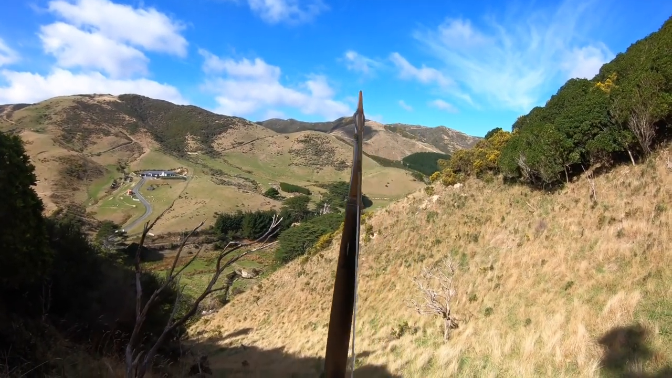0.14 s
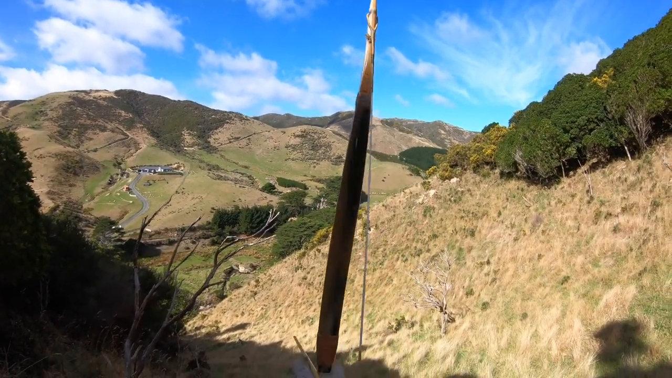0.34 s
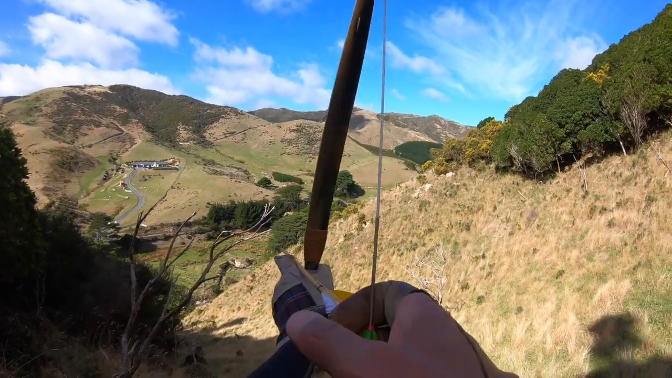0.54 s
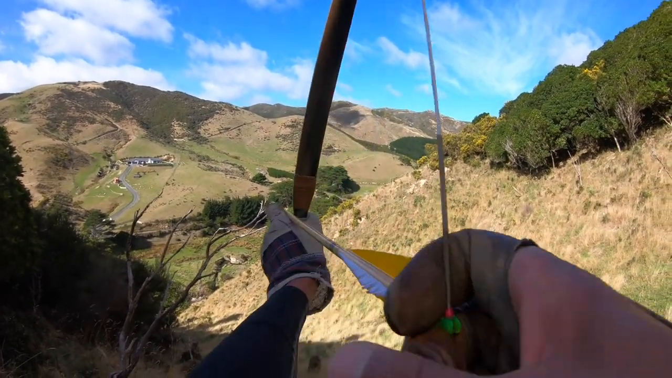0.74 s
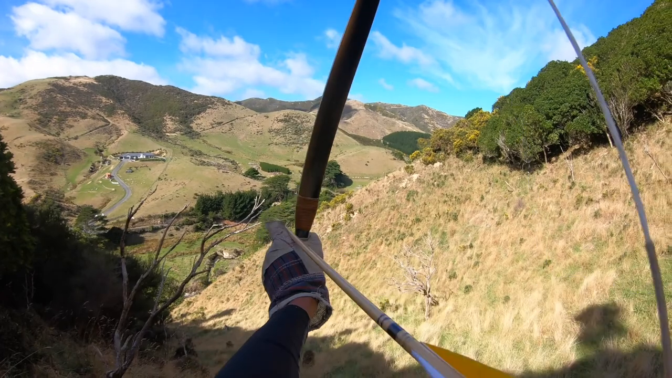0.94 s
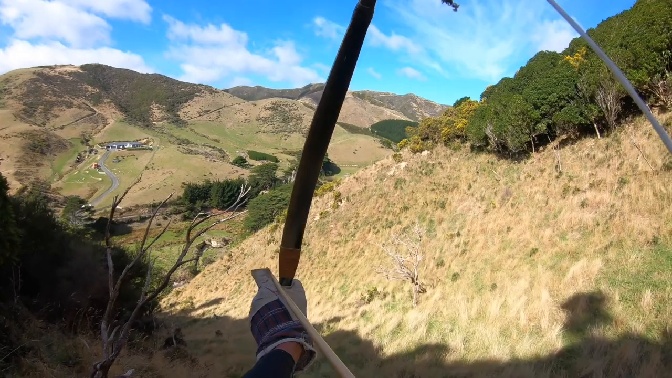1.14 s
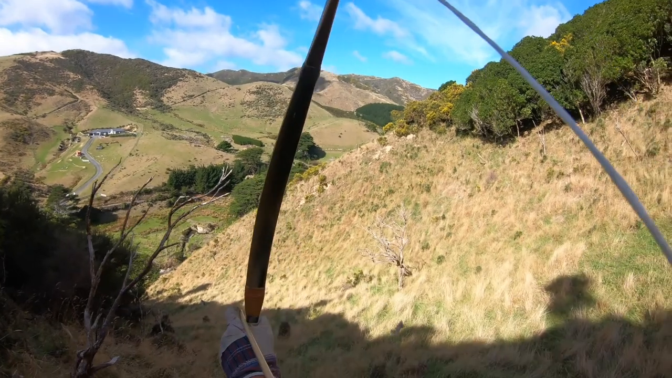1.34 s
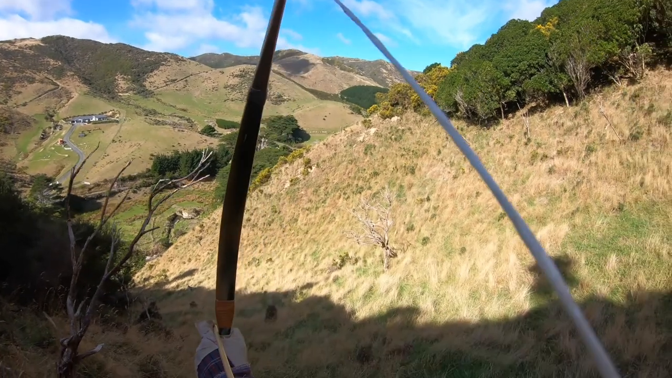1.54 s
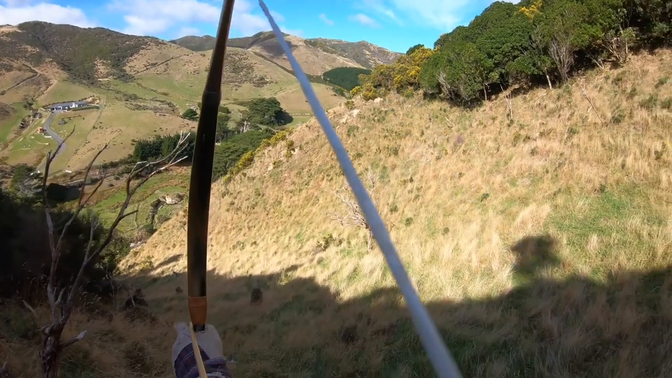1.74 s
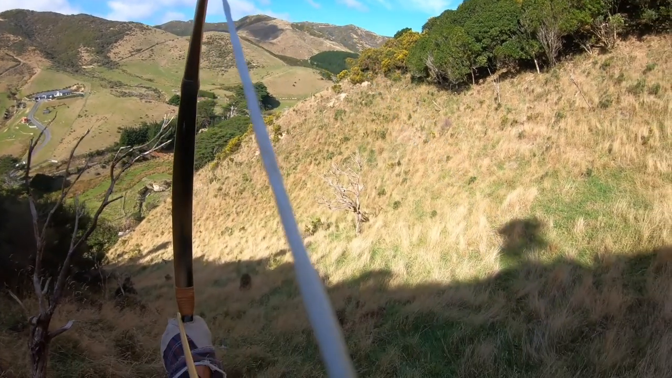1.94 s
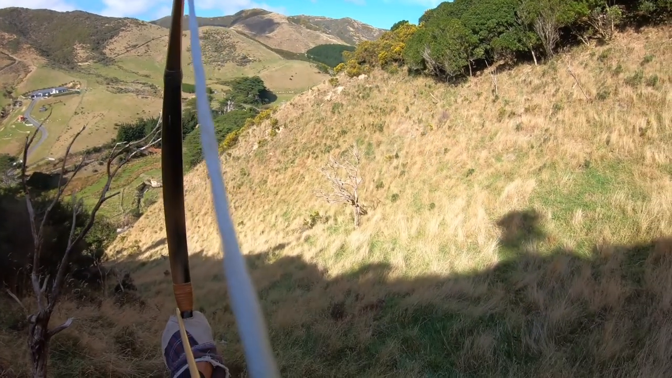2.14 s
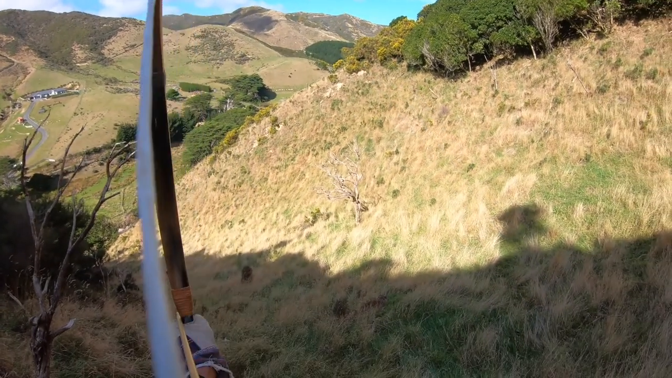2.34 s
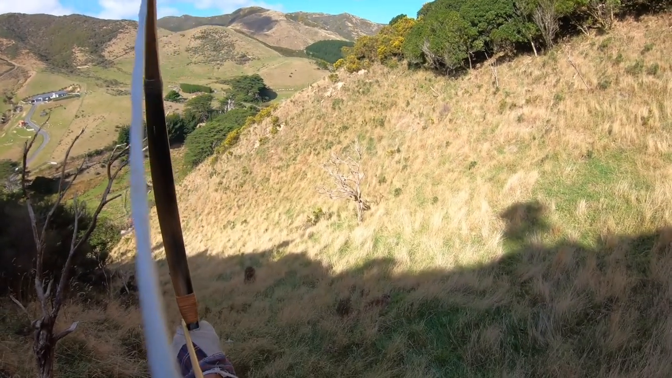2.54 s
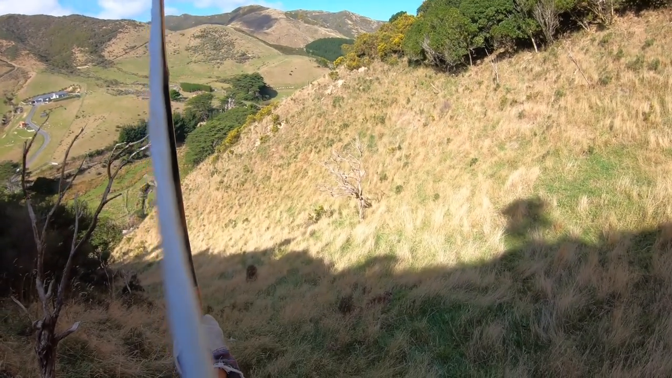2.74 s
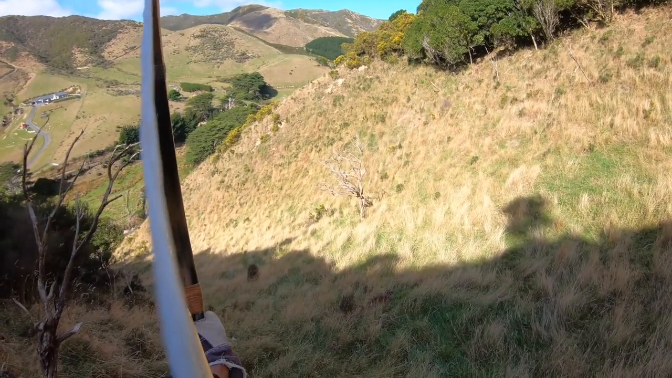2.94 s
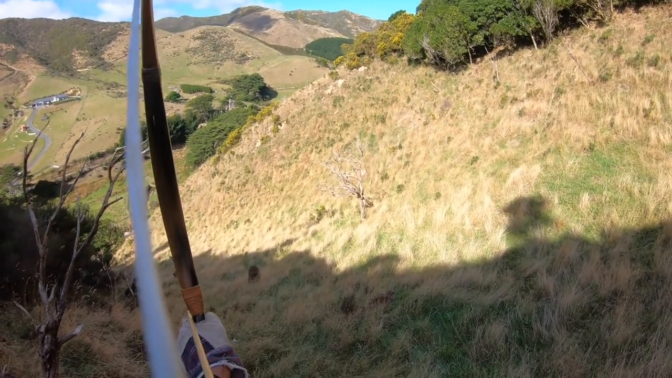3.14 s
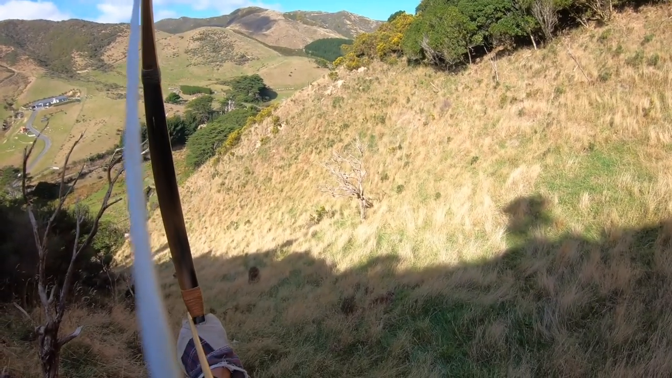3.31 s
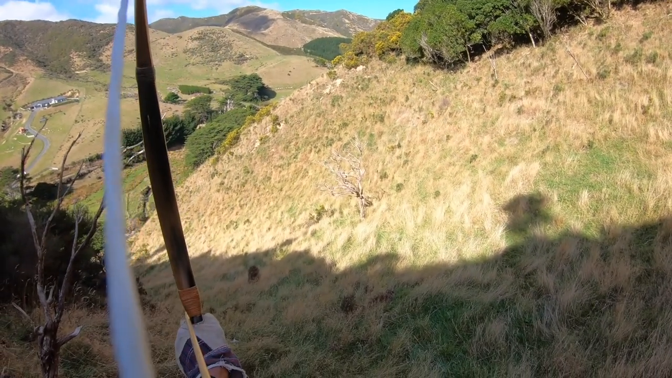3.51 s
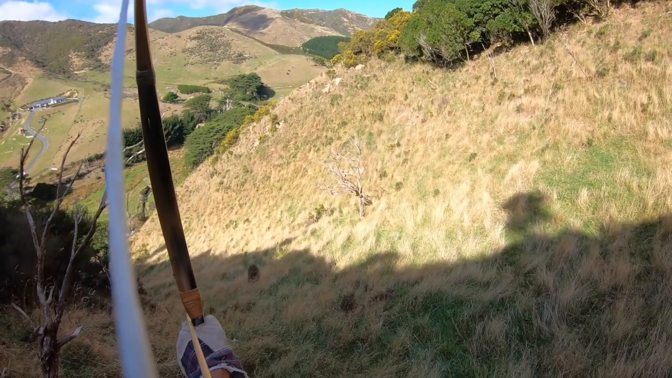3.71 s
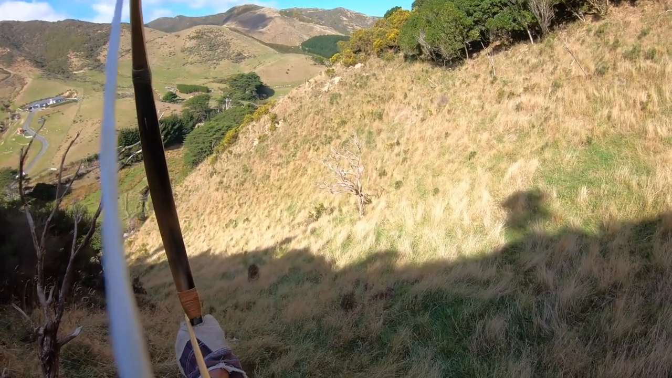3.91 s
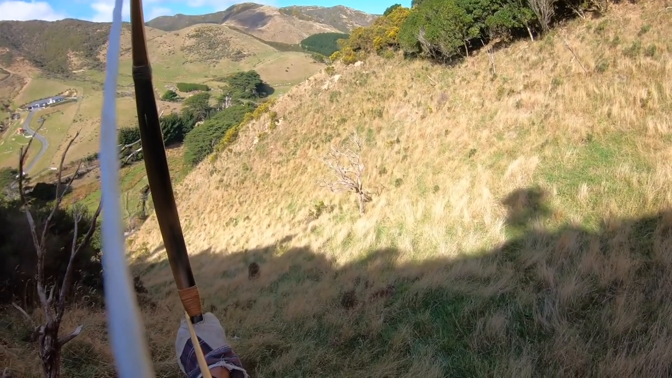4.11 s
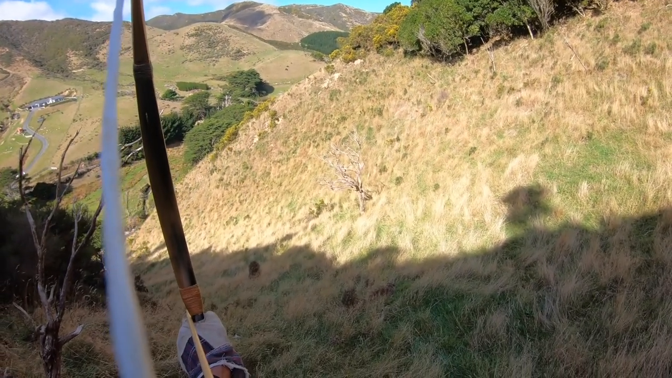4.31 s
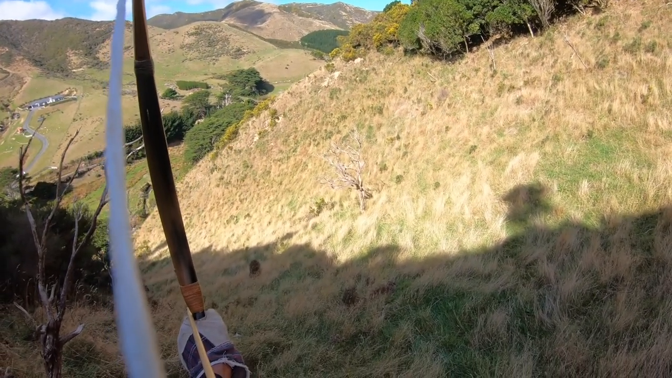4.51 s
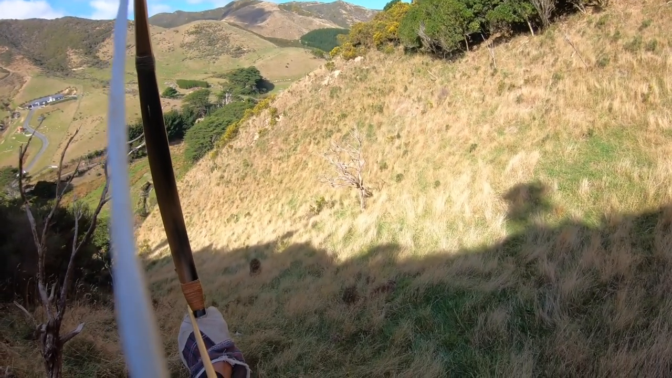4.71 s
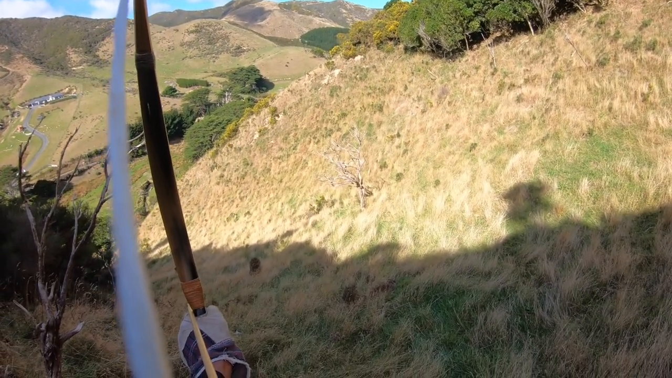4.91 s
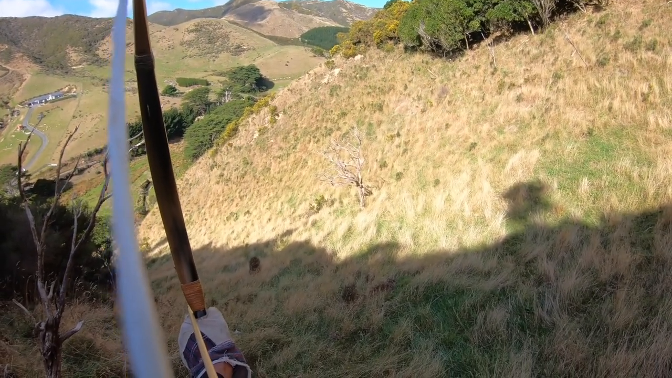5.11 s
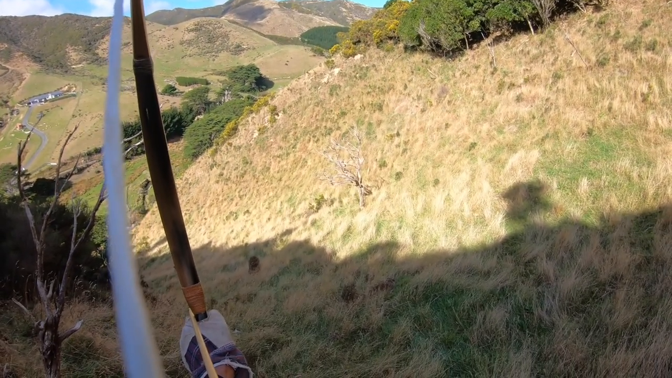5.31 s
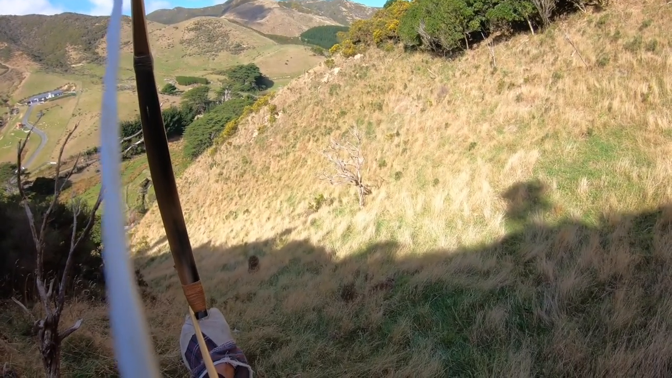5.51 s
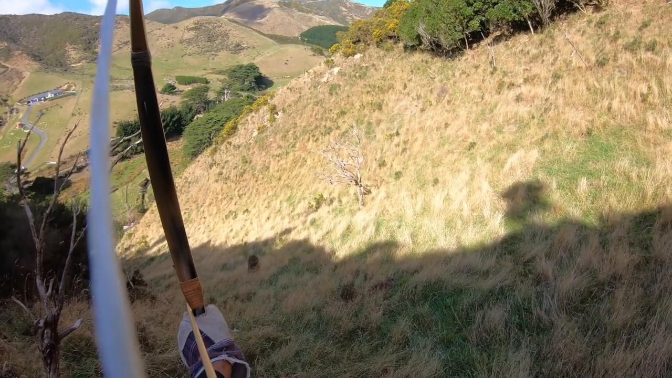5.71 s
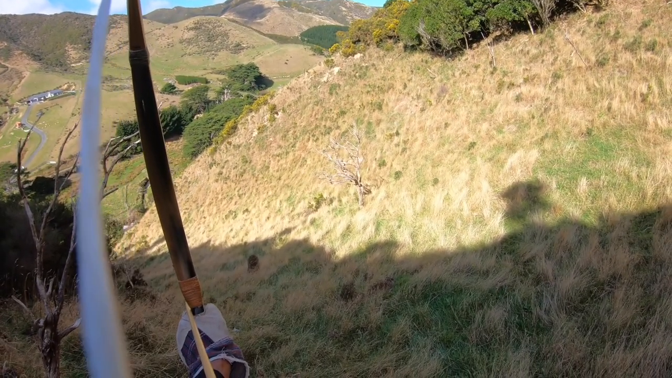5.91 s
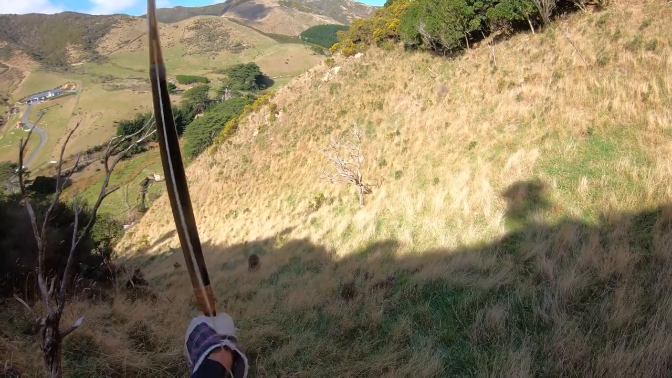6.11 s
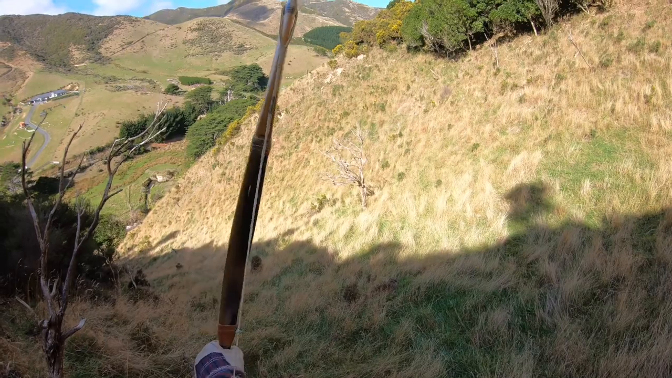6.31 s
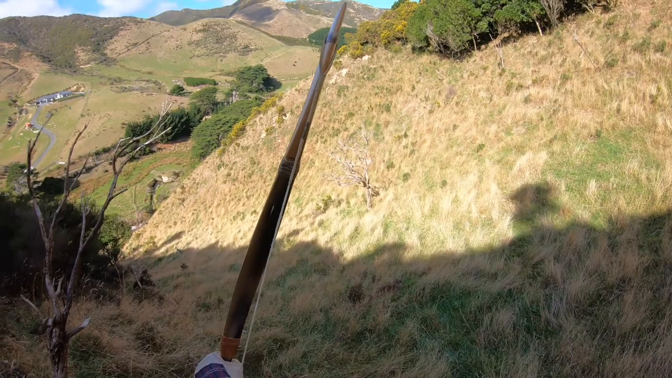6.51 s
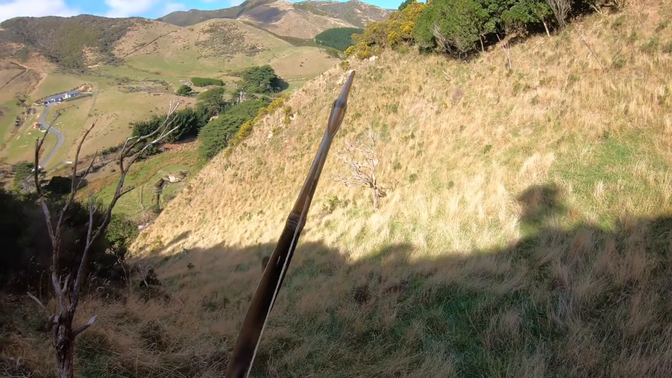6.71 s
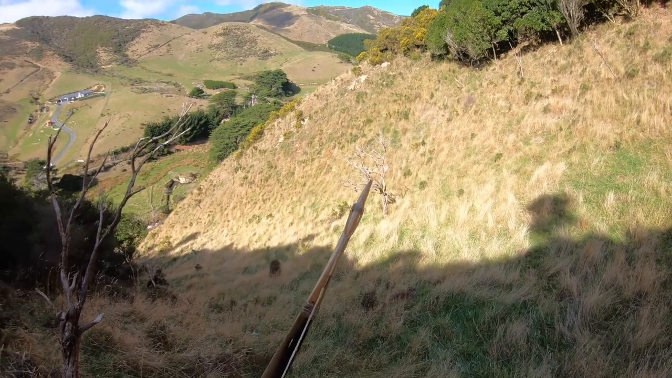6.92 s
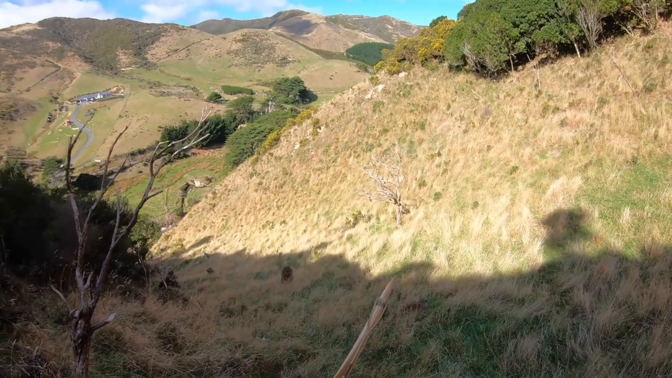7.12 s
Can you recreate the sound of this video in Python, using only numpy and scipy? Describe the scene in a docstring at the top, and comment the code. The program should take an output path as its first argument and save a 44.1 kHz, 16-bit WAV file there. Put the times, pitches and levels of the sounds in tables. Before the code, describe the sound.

Close to the microphone, an archer raises and draws a wooden bow: sleeve rustle, gritty shaft scrape, creaks and small wooden ticks. The hold is nearly still, with a thin sinking whine and sparse ticks. Then the arrow is released with a very loud crack, woody ringing, thump and throbbing string hum. A knock and dull bump follow. High insect chirr continues throughout on an open hillside, with faint bird whistles.

```python
"""Insects chirr in dry grass under a hushed valley; small birds whistle and chip, as filtered noise and glides.
Right beside the microphone an archer draws a wooden bow: sleeve and shaft are noise grains and stick-slip,
the ticks are ringing wood, the creaks narrow noise. A faint whine sinks while the bow is held.
At six seconds the arrow goes: noise blows, a rising zip, a crack, ringing bow modes, puffs of air on the
microphone and a throbbing string hum; a dull grip bump follows, and the slope scatters the shot faintly."""
import sys
import numpy as np
from scipy import signal
from scipy.fft import rfft, irfft
from scipy.io import wavfile

SR = 44100
rng = np.random.default_rng(int(sys.argv[2]) if len(sys.argv) > 2 else 0)


def output_pcm(signal):
    """Save a mono or channel-first signal as 16-bit PCM at the path in sys.argv[1].

    Samples are clipped to [-1, 1] before scaling.
    """
    pcm = np.clip(np.atleast_2d(signal).T, -1, 1) * 32767
    wavfile.write(sys.argv[1], SR, np.round(pcm).astype(np.int16))


N = 315315
T = np.arange(N) / SR  # t/s

# Spectra are relative. Side is left minus right. Rise and fall of a gesture are its times to 1/e.
# still air over the valley: f/Hz, density/dB per Hz
AIR_SPECTRUM = [(20, -3), (45, 5.5), (85, -13), (170, 7.5), (300, -1.5), (520, -7), (760, 7.5),
                (1200, -3.5), (2000, -12), (4000, -20.5), (6000, -14), (10000, -57), (13000, -9.5),
                (16000, -30.5)]
AIR_DB = -68
# its left-right likeness: f/Hz, likeness/(-1 to 1)
AIR_LIKENESS = [(50, -0.13), (170, 0.15), (400, -0.79), (750, -0.71), (1700, -0.18), (3400, .4),
                (12000, -0.072)]
# light gusts on the microphone: t/s at the peak, level/dB
GUSTS = [(0.731, -75), (1.36, -70), (1.51, -67), (1.78, -71), (1.9, -73), (2.8, -74), (2.93, -74),
         (5.1, -75)]
GUST_RISE_S, GUST_FALL_S, BREEZE_DB = .05, .05, -87  # the breeze fills the time between gusts

# insect chorus: f/Hz, density/dB per Hz
CHIRR_SPECTRUM = [(5000, -43.5), (6200, -23.5), (6700, -10.5), (7100, -2), (7500, 1), (7850, -1.5),
                  (8150, -6.5), (8450, -17.5), (8750, -43), (9300, -62)]
# base level/dB and the lift/dB as more insects join; from, until, fade in, fade out: t/s
CHORUS_DB, JOIN_DB = -53, 2.5
JOIN_S, LEAVE_S, JOIN_FADE_S, LEAVE_FADE_S = 1.38, 6.4, 0.74, .35

# sleeve and glove rustle: f/Hz, density/dB per Hz
RUSTLE_SPECTRUM = [(60, -29.5), (170, 10), (350, 0), (700, 1.5), (1400, 6), (2500, 2.5), (4500, -0.5),
                   (8000, -16.5), (14000, -29.5)]
# arms raising, drawing, settling at anchor, lowering: t/s at the peak, level/dB before flutter, rise/s, fall/s
ARM_MOVES = [(.8, -65, 0.7, 0.47), (1.08, -62, .1, 0.18), (1.5, -70.5, 0.2, 0.45), (1.92, -65, 0.1, 0.19),
             (2.43, -64, .15, 0.089), (2.61, -65, 0.029, 0.063), (3.1, -72.5, .7, 0.68),
             (6.28, -68.5, .08, 0.28), (6.6, -69, .05, .13), (6.87, -73, .05, .08),
             (7.02, -71, 0.045, 0.031)]
STILL_DB = -84.5  # rustle while the arms hold still
# resonances of the sliding shaft: f/Hz, width/Hz, relative height/dB
SHAFT_MODES = [(330, 90, -7), (540, 80, -3), (670, 70, 0), (1120, 140, -7), (1480, 180, -8), (2060, 90, -8),
               (3000, 400, -16)]
# pulls that slide the shaft over the bow: t/s at the peak, level/dB, rise/s, fall/s
PULLS = [(.07, -72, 0.099, .2), (.81, -59.5, .05, .13), (1.06, -57.5, 0.099, 0.098),
         (1.42, -68, 0.31, 0.25)]

# a far bird's soft whistle: t/s, level/dB
WHISTLES = [(.15, -75), (2.204, -74), (2.388, -69), (4.121, -75), (5.525, -75), (5.91, -76), (6.255, -71),
            (6.79, -71), (6.979, -71)]
WHISTLE_S, WHISTLE_HZ = .062, (5760, 5590, 5530)  # length; pitch at start, middle and end
# a nearer bird's quick chips: t/s, level/dB, lowest f/Hz
CHIPS = [(1.564, -52.5, 4920), (1.625, -62.5, 3900), (4.843, -53.5, 5010)]
CHIP_S, CHIP_RATIO = .011, 1.37  # length; start and end pitch over the lowest

# soft creaks of bow and shaft: t/s, length/s, f/Hz, width/Hz, level/dB
CREAKS = [(.7, .6, 220, 110, -68), (.92, .27, 2050, 55, -60), (.97, .17, 650, 90, -57),
          (1.52, .04, 560, 90, -61), (1.94, .11, 3100, 150, -69), (2.42, .17, 565, 15, -70),
          (2.72, .25, 240, 60, -70), (2.73, .14, 570, 20, -75), (2.85, .7, 3150, 280, -77),
          (3.2, .25, 450, 15, -76), (3.22, .42, 1575, 18, -76), (6.99, .06, 1400, 500, -66)]

# clear wooden ticks of arrow and bow: t/s, peak level/dB before the wood's band limit, centre f/Hz, side/dB
TICKS = [(.715, -37.5, 1400, -1), (.731, -41.5, 1500, 2), (.798, -44.5, 1200, 3), (1.059, -46.5, 900, -18),
         (1.08, -43.5, 2050, -7), (1.149, -48.5, 2050, -11), (1.238, -51, 2070, -3), (1.26, -51, 1800, -8),
         (1.368, -47.5, 2600, -1), (1.5159, -41, 1187, -11), (1.888, -47, 2200, -6),
         (1.952, -49.5, 1310, -6), (2.209, -49.5, 1180, -8), (2.32, -52, 1300, -14),
         (2.366, -51.5, 2170, -15), (2.463, -50.5, 1100, 0), (3.217, -42.5, 790, -10.5),
         (3.538, -47, 1400, -14), (3.869, -49.5, 1250, 0), (4.171, -53.5, 1520, -11),
         (4.571, -48.5, 2080, 0), (6.363, -49.5, 3000, -1), (6.672, -53, 3200, -4.5),
         (6.7758, -32, 1275, 1), (6.876, -52.5, 1820, -7.5)]
# what arrow and riser ring with at a tick: f/Hz, relative level/dB, t60/s
WOOD_MODES = [(414, -6, 0.16), (710, -2.5, 0.054), (840, 1, 0.031), (1200, 1, 0.023), (1525, 1.5, 0.014),
              (2080, -4, 0.019), (3030, 1, .015), (4200, -4.5, .012)]
# contact click: level against the knock, band edges as multiples of the tick's pitch, decay
CLICK_DB, CLICK_LOW, CLICK_HIGH, CLICK_T60 = -8, 0.48, 1.76, .019
# chance ticks while the arms move: rate, greatest peak over the motion gain (dB), centre f/Hz, side/dB
FAINT_PER_S, FAINT_OVER_DB, FAINT_HZ, FAINT_SIDE_DB = 13, 9, 1700, -8

# sharp snicks in the dry grass: t/s, peak level/dB
SNICKS = [(.829, -40), (1.6, -45), (1.92, -42), (2.42, -42), (2.625, -37), (2.699, -39), (2.925, -39.5),
          (3.6758, -34), (4.174, -41)]

# the whine: start, length and fades t/s; resting pitch, how far above it starts, time to sink
WHINE_S, WHINE_LENGTH_S, WHINE_FADE_S = 2.88, 1.137, .06
WHINE_REST_HZ, WHINE_ABOVE_HZ, WHINE_SINK_S = 590, 165, .72
WHINE_DB, WHINE_SWELL_DB = -77, 12  # starting level and growth

# fingers slip, string and arrow rush past, the string stops, the bow shudders:
# t/s, level/dB before flutter and trim, rise/s, t60/s, tilt/dB per octave, side/dB
BLOWS = [(6.0493, -42, 0.0011, .02, 0.5, -8.5), (6.058, -42, 0.00078, .03, 4, -11),
         (6.079, -38, 0.0068, .06, 2.5, 0), (6.092, -17, 0.003, .045, 0.4, -7),
         (6.1097, -25, 0.0079, 0.085, 1.2, -0.5), (6.121, -23, 0.00087, 0.066, -1.8, 2.5),
         (6.154, -48, .003, .1, 4, -0.5), (6.178, -41, 0.008, 0.093, 2, 1),
         (6.197, -37.5, 0.0071, 0.084, 2, -2.5)]
# their common colour: f/Hz, density/dB per Hz
SNAP_SPECTRUM = [(60, -12), (200, 0), (420, 1), (900, -0.5), (1600, -2), (2200, -9.5), (3000, -6),
                 (3900, -8), (4800, -12.5), (7500, -16), (9000, -24), (15000, -44.5)]
# the nock cracks off the string: t/s, level/dB
CRACK_S, CRACK_DB = 6.1097, -13
# its colour: f/Hz, density/dB per Hz
CRACK_SPECTRUM = [(1000, -19), (2300, -13), (2900, -3), (3800, -11.5), (4500, -1.5), (6000, -1), (6800, -9),
                  (8000, -6.5), (10000, -24), (15000, -33)]

# string hum: start t/s, rise/s, level/dB before rise, throb and decay, t60/s
HUM_S, HUM_RISE_S, HUM_DB, HUM_T60 = 6.084, .025, -16.5, .43
HUM_HZ, HUM_FLAT_HZ, SETTLE_S = 259, 39, .083  # resting pitch, how flat it starts, time to settle
SWAY_HZ, SWAY_DB, SWAY_S = 13, 2, .2  # throb from the swaying limbs: rate, depth, time to die down

# bow modes at the string's stop: f/Hz, level/dB before the jolt gain, t60/s
BOW_MODES = [(156, -42, .4), (292, -23.5, .12), (316, -30, .1), (352, -26, .12), (386, -31, .1),
             (414, -27, .1), (447, -22.5, .11), (565, -31, .11), (612, -30, .11), (682, -25, .12),
             (943, -28, .11), (1011, -24.5, .12), (1118, -32, .1), (1175, -33, .1), (1200, -29, .11),
             (1377, -28.5, .1), (1560, -32, .08), (1660, -28, .09), (1906, -24.5, .095), (2280, -36, .11),
             (2580, -37, .11), (2860, -39, .16), (3480, -37, .1), (3607, -38, .12), (4200, -40, .17)]
BOW_DB = -0.5  # jolt gain
# deep thump of the limbs: f/Hz, level/dB before its slow start, t60/s
LIMB_MODES = [(135, -4.5, .11)]
# air shoved at the microphone by limbs and hand: t/s, peak level/dB, half-length/s, side/dB
PUFFS = [(6.107, -19, 0.0042, -4), (6.104, -32, .009, -5), (6.164, -30.5, 0.013, -8),
         (6.181, -30, 0.0045, -21), (6.226, -37.5, 0.0079, -12), (6.252, -48, 0.017, 8)]
BUMP_S = 6.7808
# dull bump of the grip: f/Hz, level/dB, t60/s
GRIP_MODES = [(95, -48, .09), (150, -45.5, 0.045)]

CUT_HZ = 15800  # the recorder's upper limit


def amp(db):
    """Decibels to gain."""
    return 10 ** (np.asarray(db) / 20)


def unit(x):
    """Scales to rms 1."""
    return x / np.sqrt(np.mean(x ** 2) + 1e-20)


def read(points, hz):
    """Reads a spectrum on a log-frequency axis."""
    f, value = np.transpose(points)
    return np.interp(np.log(hz + 1), np.log(f + 1), value)


def pan(db):
    """Left and right gains for a level difference."""
    return amp([[db / 2], [-db / 2]])


def add(mix, s, sound):
    """Mixes a sound in at time s."""
    part = mix[:, max(round(s * SR), 0):][:, :sound.shape[-1]]
    part += sound[..., :part.shape[1]]


def noise(colour, same, size=N, lead=0.):
    """Stereo noise of rms 1; colour gives dB from Hz, same is the likeness of the sides, lead their phase."""
    hz = np.fft.rfftfreq(size, 1 / SR)
    a, b = np.exp(2j * np.pi * rng.random((2, len(hz))))
    c = np.clip(same if np.isscalar(same) else read(same, hz), -1, 1)
    right = (c * a + np.sqrt(1 - c ** 2) * b) * np.exp(-1j * lead)
    sides = np.array([a, right])
    return unit(irfft(sides * amp(colour(hz)), size))


def drift(rate_hz):
    """Slow chance of rms 1."""
    hz = np.fft.rfftfreq(N, 1 / SR)
    return unit(irfft(rfft(rng.standard_normal(N)) * np.exp(-(hz / rate_hz) ** 2), N))


def burst(colour, rise, t60, same, size=8192):
    """A noise burst that swells and dies, and its start time against the peak."""
    t = (np.arange(size) - size // 4) / SR
    shape = np.exp(np.minimum(t, 0) / rise - np.log(1000) * np.maximum(t, 0) / t60)
    return t[0], noise(colour, same, size=size) * shape


def ring(modes, size=16384):
    """The free ringing of modes (f/Hz, level/dB, t60/s)."""
    t = np.arange(size) / SR
    return sum(amp(db - 60 * t / t60) * np.sin(2 * np.pi * hz * t) for hz, db, t60 in modes)


def sweep(hz):
    """A sine whose phase accumulates a changing pitch."""
    return np.sin(2 * np.pi * np.cumsum(hz) / SR)


def swell(peak_s, db, rise, fall):
    """The gain of one gesture: it grows to a rounded peak and dies away."""
    away = np.maximum((peak_s - T) / rise, (T - peak_s) / fall)
    return amp(db) * np.exp(-np.minimum(away, 10) ** 1.9)


def gestures(rows, rest=0.):
    """The joint gain of overlapping gestures over a resting gain, summed as power."""
    return np.sqrt(rest ** 2 + sum(swell(*row) ** 2 for row in rows))


def hillside(x, t60, bright_hz):
    """Thin scatter from grass, trees and slope: a decaying noise tail, weak in bass and far treble."""
    def colour(hz):
        return -10 * np.log10((1 + (hz / bright_hz) ** 2) * (1 + (400 / (hz + 1)) ** 2))

    t = np.arange(SR) / SR
    tail = noise(colour, 0.067, size=SR)
    tail *= np.exp(-np.log(1000) * t / t60) * (1 - np.exp(-t / 0.017))
    return signal.fftconvolve(x, tail / np.linalg.norm(tail[0]), axes=1)[:, :N]


def air():
    """The valley's hush is steady noise; light gusts rumble on the microphone as low noise."""
    hush = amp(AIR_DB + 0.52 * drift(5.8)) * noise(lambda hz: read(AIR_SPECTRUM, hz), AIR_LIKENESS)
    rumble = noise(lambda hz: -20 * np.log10(1 + (hz / 38) ** 4), 0.36)
    wind = gestures([(s, db, GUST_RISE_S, GUST_FALL_S) for s, db in GUSTS], amp(BREEZE_DB))
    return hush + wind * amp(3 * drift(6)) * rumble * pan(-12)


def insects():
    """Many insects merge into one narrow, finely fluttering band, off to one side."""
    chorus = noise(lambda hz: read(CHIRR_SPECTRUM, hz), 0.85, lead=1.995)
    fade_in = (T - JOIN_S) / JOIN_FADE_S
    fade_out = (LEAVE_S - T) / LEAVE_FADE_S
    joined = np.clip(np.minimum(fade_in, fade_out), 0, 1)
    return chorus * amp(CHORUS_DB + JOIN_DB * joined + .3 * drift(3) + .6 * drift(70)) * pan(-0.41)


def sleeve(motion):
    """Cloth rustles in grains as the arms move: noise with a fast, rough level."""
    grains = amp(2.6 * drift(300) + 2 * drift(40))
    return noise(lambda hz: read(RUSTLE_SPECTRUM, hz), .3) * motion * grains * pan(-2.9)


def shaft_scrape():
    """The shaft sticks and slips along the bow, about 450 slips a second exciting its resonances."""
    slips = (rng.random(N) < 450 / SR) * rng.standard_normal(N) * amp(3 * drift(70))
    slips = slips * (1 + 0.55 * rng.standard_normal((2, N)))  # each slip reaches the two sides unequally
    # level grows with width, so that shorter ringing keeps the tabled height
    modes = [(hz, db + 20 * np.log10(width), np.log(1000) / np.pi / width) for hz, width, db in SHAFT_MODES]
    shaft = signal.sosfilt(signal.butter(2, 280, "high", fs=SR, output="sos"), ring(modes))
    scrape = unit(signal.oaconvolve(slips, shaft[None], axes=1)[:, :N])
    return scrape * gestures(PULLS) * pan(-3.5)


def birds():
    """Each call is one pure glide through three pitches, doubled by an echo off the ground."""
    out = np.zeros((2, N))
    calls = [(s, db, WHISTLE_S, WHISTLE_HZ) for s, db in WHISTLES]
    calls += [(s, db, CHIP_S, (hz * CHIP_RATIO, hz, hz * CHIP_RATIO)) for s, db, hz in CHIPS]
    for s, db, length, pitches in calls:
        u = np.linspace(0, 1, int(length * SR))
        hz = np.polyval(np.polyfit([0, .5, 1], pitches, 2), u)
        call = amp(db) * signal.windows.tukey(len(u), .5) * sweep(hz)
        add(out, s, call)
        add(out, s + .0045, amp(-7) * call)  # ground echo
    return out + amp(-13) * hillside(out, .11, 9000)


def creaks():
    """Narrow bands of friction swell and fade as the bow is loaded and handled."""
    out = np.zeros((2, N))
    for s, length, centre, width, db in CREAKS:
        size = int(length * SR)
        rub = noise(lambda hz: -20 * np.log10(1 + ((hz - centre) / width) ** 2), 0.35, size=size)
        add(out, s, amp(db) * rub * np.sin(np.linspace(0, np.pi, size)))
    return out


def knock(centre_hz):
    """The wood's modes nearest to a tick's pitch, with a peak of 1."""
    modes = []
    for hz, db, t60 in WOOD_MODES:
        octaves = np.log2(hz / centre_hz)
        modes.append((hz, db - 14 * np.log10(1 + (octaves / 0.42) ** 2), t60))
    wood = ring(modes)
    return wood / abs(wood).max()


def ticks(motion):
    """Each clear tick is a contact click and a knock; faint knocks scatter wherever the arms move."""
    out = np.zeros((2, N))
    for s, db, centre, side in TICKS:
        add(out, s, amp(db) * knock(centre) * pan(side))
        low, high = CLICK_LOW * centre, CLICK_HIGH * centre

        def colour(hz):
            return -10 * np.log10((1 + (low / (hz + 1)) ** 4) * (1 + (hz / high) ** 4))

        early, click = burst(colour, 0.00067, CLICK_T60, 0.27)
        add(out, s + early, amp(db + CLICK_DB) * click * pan(side))
    touches = (rng.random(N) < FAINT_PER_S / SR) * rng.uniform(.5, 1, N) * motion
    out += amp(FAINT_OVER_DB) * signal.oaconvolve(touches, knock(FAINT_HZ))[:N] * pan(FAINT_SIDE_DB)
    thin_wood = signal.butter(2, [340, 7000], "band", fs=SR, output="sos")  # radiates no bass and little top
    return signal.sosfilt(thin_wood, out)


def grass():
    """Dry stems snick: a few cycles of treble each."""
    out = np.zeros((2, N))
    t = np.arange(-64, 64) / SR
    snick = np.exp(-(t / .00022) ** 2) * np.cos(2 * np.pi * 7500 * t)
    for s, db in SNICKS:
        add(out, s + t[0], amp(db) * snick * pan(-4.2))
    return out


def whine():
    """A thin, unsteady tone sinks towards a resting pitch and swells while the bow is held."""
    t = np.clip(T - WHINE_S, 0, WHINE_LENGTH_S)
    hz = (WHINE_REST_HZ + WHINE_ABOVE_HZ * np.exp(-t / WHINE_SINK_S)) * (1 + 0.0035 * drift(25))
    fade = np.minimum(np.minimum(t, WHINE_LENGTH_S - t) / WHINE_FADE_S, 1)
    level = amp(WHINE_DB + WHINE_SWELL_DB * (t / WHINE_LENGTH_S) ** 2 + 2.4 * drift(20))
    return fade * level * sweep(hz)


def release():
    """The clatter of string and arrow, the rising zip of the shaft, and the crack of the nock."""
    out = np.zeros((2, N))
    likeness = [(300, .9), (700, .4), (8000, 0.11)]  # f/Hz, likeness: the sides part in the treble
    for s, db, rise, t60, tilt, side in BLOWS:

        def colour(hz):
            return read(SNAP_SPECTRUM, hz) + tilt * np.log2((hz + 200) / 1000)

        early, blow = burst(colour, rise, t60, likeness)
        add(out, s + early, amp(db) * blow * pan(side))
    out *= amp(2.2 * drift(450) - .6)  # rough flutter and a small trim
    hz = np.geomspace(1500, 4200, int(.012 * SR))  # the zip rises as the arrow gathers speed
    add(out, 6.097, amp(-23.5) * np.hanning(len(hz)) * sweep(hz) * pan(-2))
    early, crack = burst(lambda hz: read(CRACK_SPECTRUM, hz), 0.00027, 0.012, 0.22)
    add(out, CRACK_S + early, amp(CRACK_DB) * crack * pan(-0.9))
    return out


def string():
    """The string hums out between the swaying limbs, rising to its resting pitch."""
    t = np.maximum(T - HUM_S, 0)
    hz = (HUM_HZ - HUM_FLAT_HZ * np.exp(-(t / SETTLE_S) ** 1.5)) * (1 + .006 * drift(50))
    throb = -SWAY_DB * np.cos(2 * np.pi * SWAY_HZ * t) * np.exp(-t / SWAY_S)
    level = np.minimum(t / HUM_RISE_S, 1) * amp(HUM_DB + throb) * np.exp(-np.log(1000) * t / HUM_T60)
    return level * sweep(hz)


def bow():
    """The arrow's slap and then the stopped string jolt the bow into ringing; later the grip bumps."""
    out = np.zeros((2, N))
    wood = ring(BOW_MODES)
    t = np.arange(len(wood)) / SR
    soft = 1 - np.exp(-t / 0.0023)  # the wood takes up the jolt gradually
    heavy = 1 - np.exp(-(t / .015) ** 2)  # the heavy limbs need a few cycles to get going
    # a touch damps the higher modes quickly
    slap = ring([(hz, db, 0.37 * t60) for hz, db, t60 in BOW_MODES if hz > 400]) * soft
    add(out, 6.0905, amp(-3.0) * slap * pan(-4.5))
    add(out, 6.1012, ring(LIMB_MODES) * heavy)
    add(out, CRACK_S, -amp(BOW_DB) * wood * soft * pan(-.8))
    add(out, 6.197, amp(-18) * slap * pan(-1))
    add(out, BUMP_S, ring(GRIP_MODES))
    return out


def puffs():
    """Each shove of air at the microphone is a push followed by a suck."""
    out = np.zeros((2, N))
    for s, db, width, side in PUFFS:
        u = (T - s) / width
        out -= amp(db) * u * np.exp((1 - u ** 2) / 2) * pan(side)
    return out


def scene():
    """The close bow, its faint scatter from the slope, and the life of the hillside."""
    motion = gestures(ARM_MOVES, amp(STILL_DB))
    shot = ticks(motion) + release() + string() + bow()
    scatter = amp(-22.5) * hillside(shot, 0.4, 9400)
    handling = sleeve(motion) + shaft_scrape() + creaks() + puffs()
    surroundings = air() + insects() + birds() + grass()
    return shot + scatter + handling + whine() + surroundings


def record(dry):
    """The recorder's band limit, a linear-phase low-pass."""
    low_pass = signal.firwin(511, CUT_HZ, window=("kaiser", 9), fs=SR)
    return signal.oaconvolve(dry, low_pass[None], "same")


dry = scene()
out = record(dry)
output_pcm(out)
```